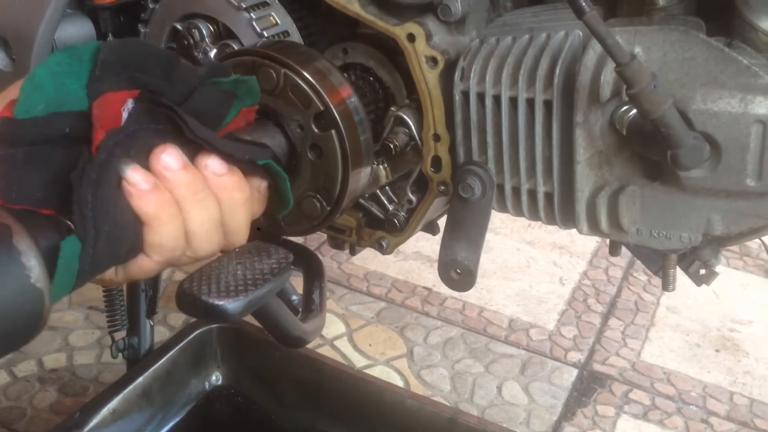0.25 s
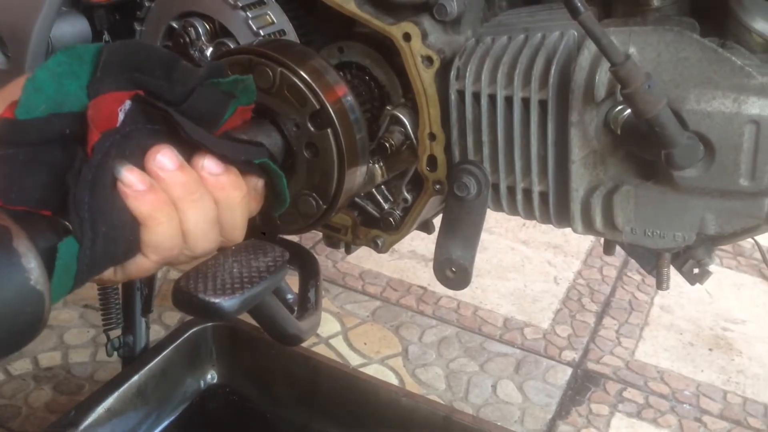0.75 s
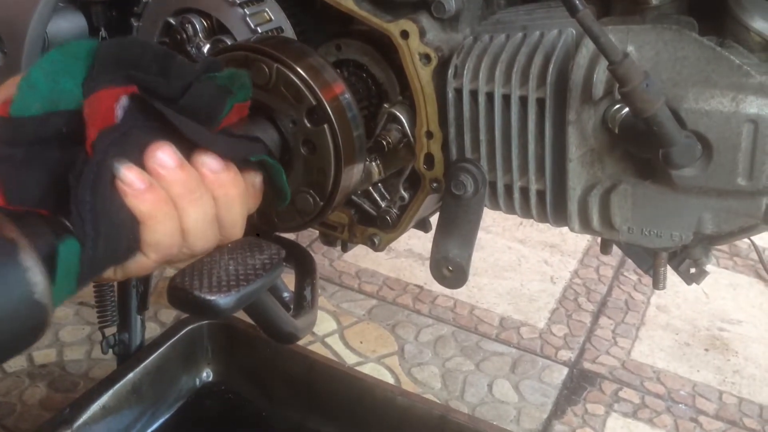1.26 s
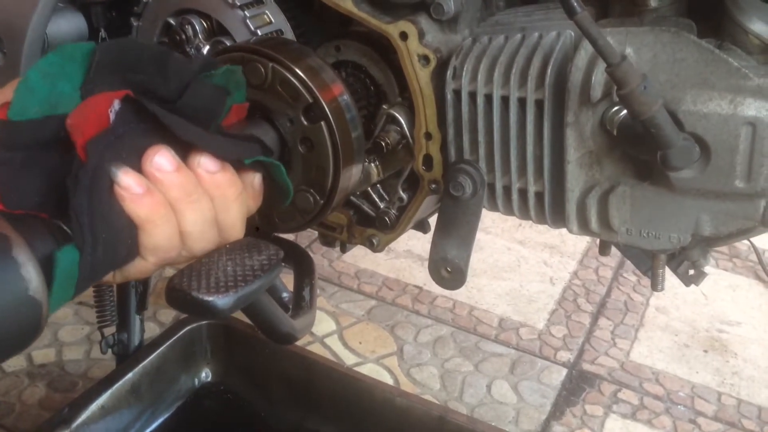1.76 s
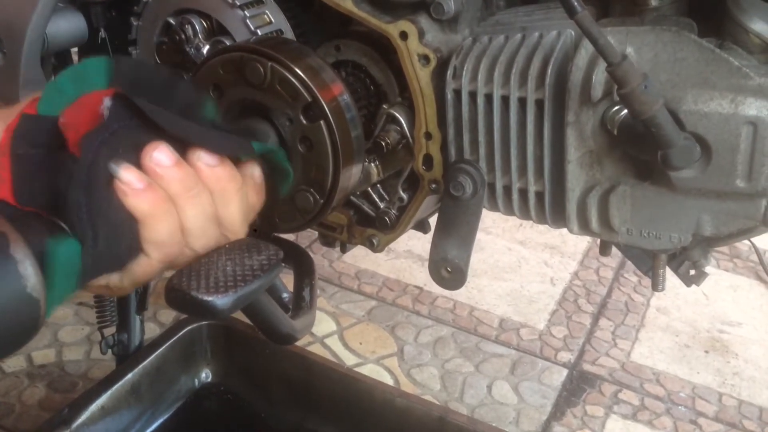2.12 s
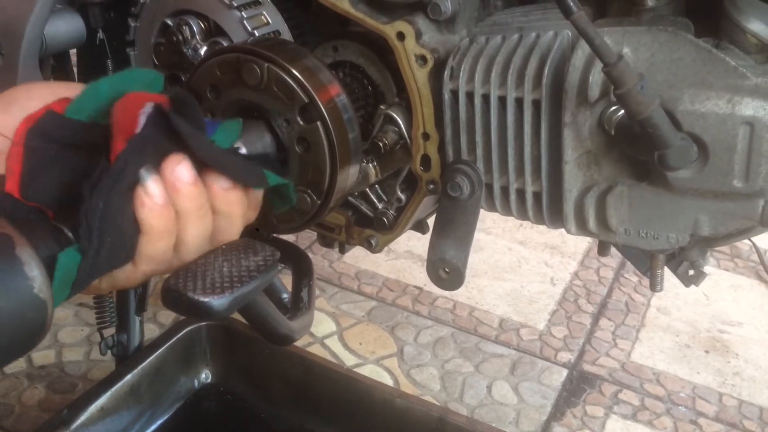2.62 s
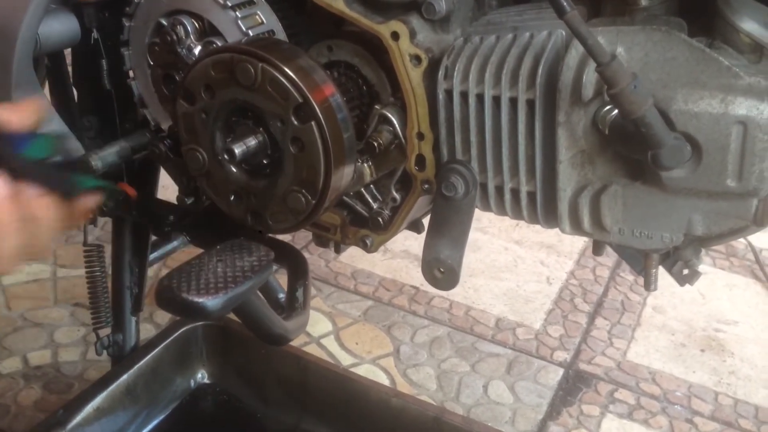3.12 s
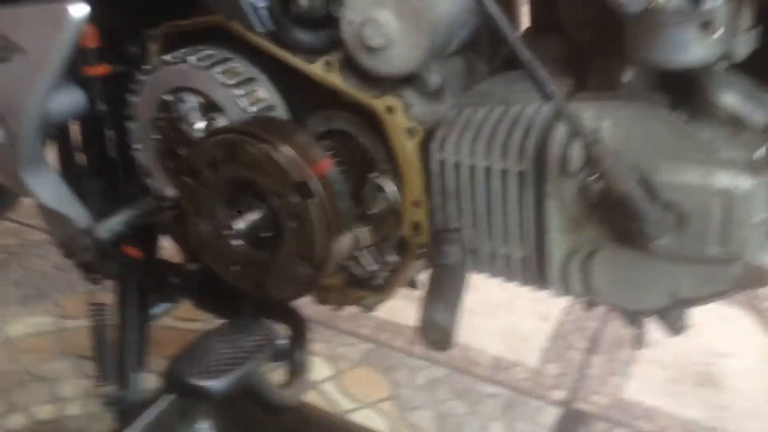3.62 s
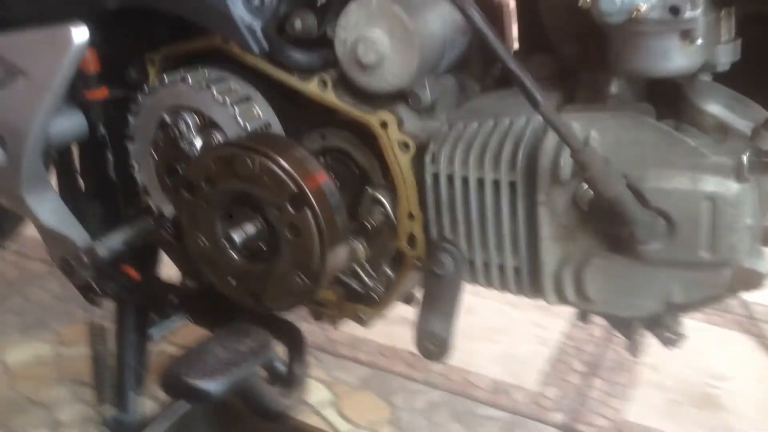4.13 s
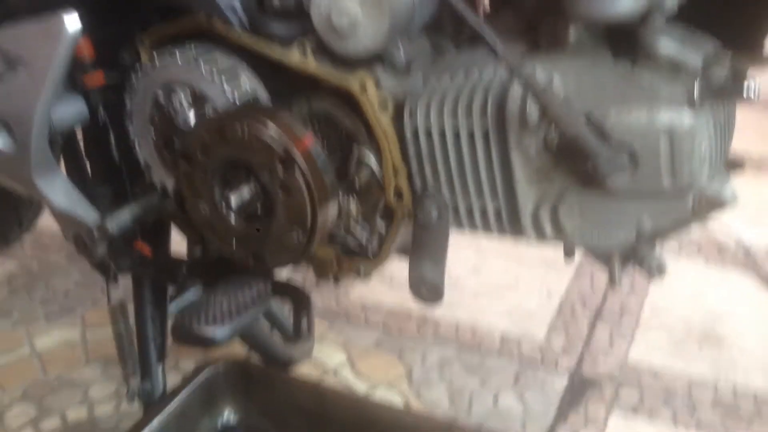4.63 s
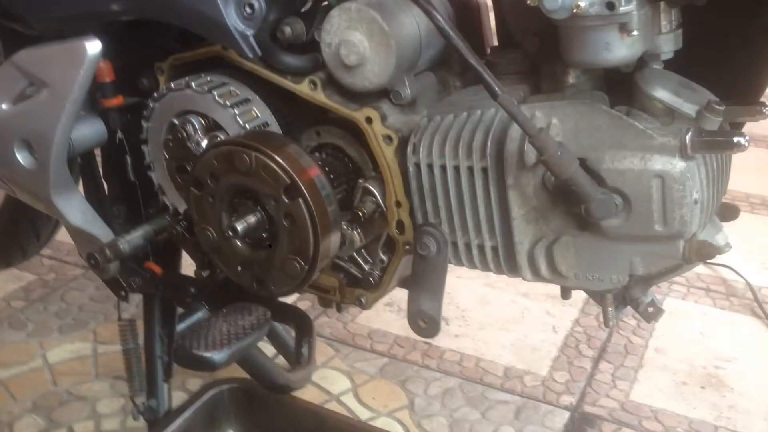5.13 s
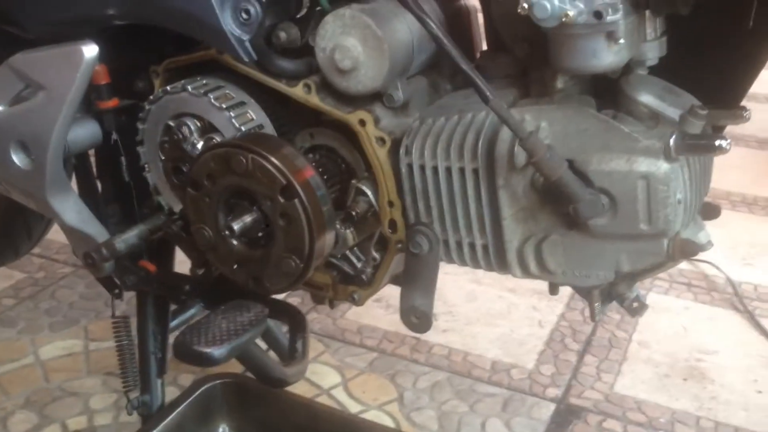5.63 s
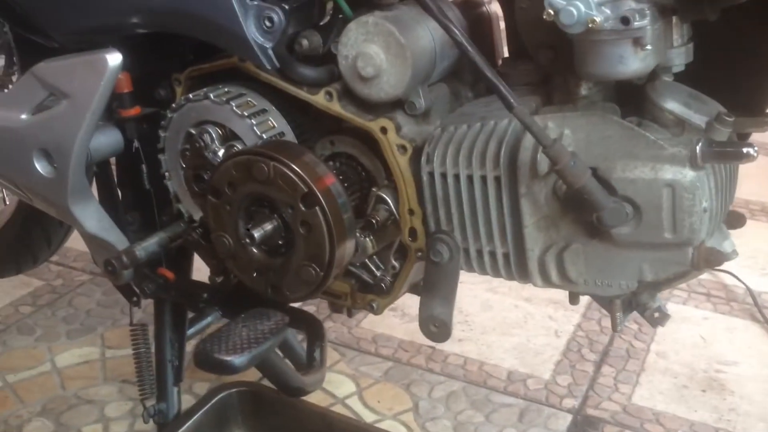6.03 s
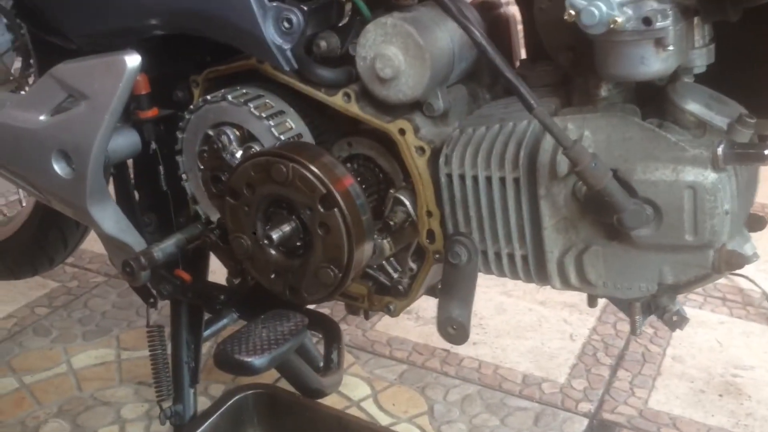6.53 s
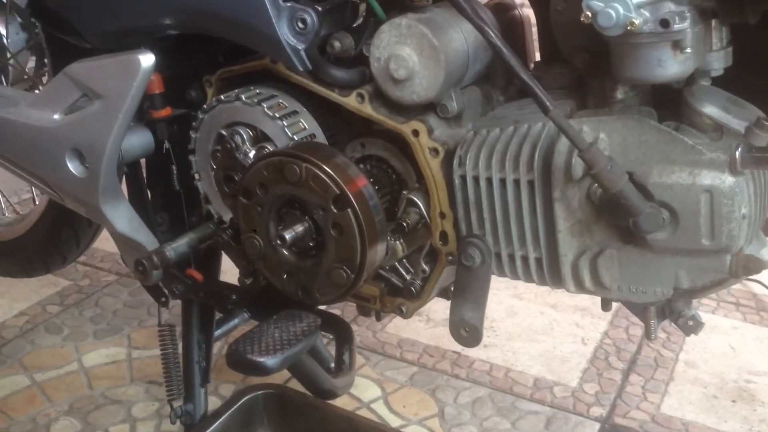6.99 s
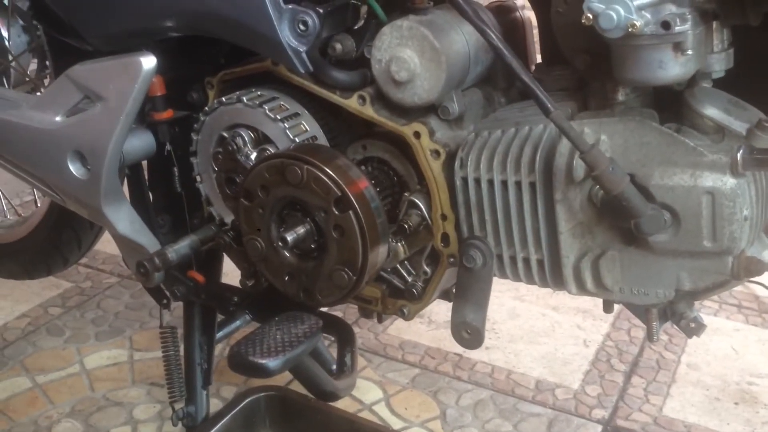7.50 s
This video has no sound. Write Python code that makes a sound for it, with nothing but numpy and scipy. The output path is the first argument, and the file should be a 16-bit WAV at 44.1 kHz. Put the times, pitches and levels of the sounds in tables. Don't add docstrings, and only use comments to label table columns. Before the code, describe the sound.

Outdoors in a paved yard, close microphone. Low traffic rumble for about a second, then an impact wrench fires three short, hard, rattling metal bursts with grinding gears. The socket slips off with a faint tinkle. After a pause with small ticks and cloth rubs, the tool is laid down in a hard clatter. Scattered small ticks follow while a motorbike putters softly in the distance.

```python
import sys
import numpy as np
from scipy import signal
from scipy.io import wavfile

SR = 44100
rng = np.random.default_rng(int(sys.argv[2]) if len(sys.argv) > 2 else 0)


def how_loud(loudness_db):
    steps = np.asarray(loudness_db, float) / 20
    return 10 ** steps


def int16_out(signal):
    q = np.round(np.clip(np.atleast_2d(signal).T, -1, 1) * 32767)
    wavfile.write(sys.argv[1], SR, q.astype(np.int16))


N = 341995

# start in seconds, peak in dB, hardness in dB, chatter length in seconds.
HAMMER_BLOWS = [(1.2752, -2, 4.5, .009), (1.2995, -8, 7, 0.012), (1.3235, -14, -3.5, 0.0074),
                (1.3425, -3.5, 0.5, 0.0063), (1.359, -20.5, 2, 0.0034), (1.410, -4, 0.5, 0.0072),
                (1.6685, -10.5, -1.5, .01), (1.691, -7, 6.5, 0.012), (1.712, -15.5, -0.5, 0.006),
                (1.732, -6, 3, 0.01), (1.8015, -7.5, 3, 0.015), (2.0235, -24, -10.5, 0.0044),
                (2.039, -22, -1.5, .003), (2.075, -4, 2, 0.012), (2.098, -1.5, 3, 0.0087),
                (2.156, -7.5, 2.5, 0.0077), (2.178, -21, 8, 0.0079)]
# start in seconds, peak in dB, hardness in dB, chatter in seconds.
SOCKET_BLOWS = [
    (2.234, -30, 2, 0.0046),
    (2.2545, -35, -3, .007),
    (2.297, -31.5, -6, .0034),
]
# start in seconds, peak in dB, hardness in dB, chatter in seconds.
NUT_BLOWS = [
    (2.6978, -48.5, 3, .003),
    (2.8579, -34, 0.5, 0.0072),
    (2.8844, -66, 2, .003),
]
# start in seconds, peak in dB, hardness in dB, chatter in seconds.
WASHER_BLOWS = [
    (.215, -70, 5, .01),
    (.850, -58, 0.3, .01),
    (.868, -59, -8, .013),
    (4.9615, -46.5, 12, 0.0085),
    (4.976, -54, 2, .006),
]
# start in seconds, peak in dB, hardness in dB, chatter in seconds.
LAY_DOWN_BLOWS = [
    (4.2398, -8, 0, 0.036),
    (4.3098, -13, 1.5, 0.032),
    (4.326, -27, -8, 0.023),
    (4.352, -15.5, 4, .03),
    (4.4507, -16, -2.5, 0.033),
    (4.505, -26, -2, 0.026),
]
# start in seconds, peak in dB, hardness in dB, chatter in seconds.
SLIDES = [
    (3.055, -40.5, -4.5, 0.042),
    (3.115, -42.5, -3.5, .025),
    (4.2, -37, -7, .07),
    (4.25, -31.5, -9.5, .07),
]
# start in seconds, peak in dB, hardness in dB, chatter in seconds.
CHUCK_RATTLES = [
    (4.2525, -27, 0.3, 0.011),
    (4.369, -27.5, -1.5, 0.03),
    (4.477, -17, 0.46, 0.016),
]
# start in seconds, peak in dB, hardness in dB, chatter in seconds.
SOFT_KNOCKS = [
    (3.044, -41, 0, 0.022),
    (4.125, -48.5, -7, 0.0088),
    (4.208, -42, -1.5, .04),
    (6.712, -27, 2, 0.019),
    (7.689, -35, -2.5, 0.024),
]
# start in seconds, peak in dB, hardness in dB, chatter in seconds.
PART_TICKS = [(.194, -42.5, -4, 0.0061), (3.267, -46, 7, 0.012), (3.594, -31, 8, 0.011),
              (4.774, -47, -8, 0.013), (4.865, -37, -2.5, 0.014), (5.021, -41, -6, 0.014),
              (5.125, -35.5, 1, 0.0077), (5.274, -43, 7, 0.0086), (6.073, -32.5, 0.5, .01),
              (6.186, -36.5, -4, 0.019), (6.283, -32.5, 1.5, .011)]

# frequency in Hz, level in dB, t60 in seconds.
CASE_MODES = [(110, -8, 0.014), (174, -18.5, 0.32), (323, -15.5, 0.013), (539, -3, 0.022), (616, -5, 0.032),
              (757, -9, 0.043), (980, 4.5, 0.016), (1100, 1.5, 0.037), (1138, 4, .02), (1570, -8, 0.03),
              (1658, -5.5, 0.014), (2200, 6.5, 0.0083), (3240, 4, 0.003), (3835, 0, 0.01),
              (4370, -2, 0.012), (4860, 0.5, 0.0076), (5530, -2.5, 0.0075), (6060, -5.5, 0.01),
              (7220, 5, 0.0027), (9090, -13, 0.00068), (10500, -5, 0.0021), (11640, -2.5, .004),
              (13050, -2.5, 0.0078), (13900, 1.5, 0.0073), (14900, 0.5, 0.0052)]
# frequency in Hz, level in dB, t60 in seconds.
SOCKET_MODES = [(4750, -6, .03), (5615, -18, .02), (7730, 0, .028), (8450, -4, .04), (10500, -8, .02),
                (11540, 0, .03), (12400, -3, .035), (13100, -8, .03)]
# frequency in Hz, level in dB, t60 in seconds.
NUT_MODES = [(2180, -4, .018), (2400, -6, .01), (13000, -8, .02), (13530, -3, .025), (14080, 0, .03),
             (14400, -1, .03), (14800, -4, .02)]
# frequency in Hz, level in dB, t60 in seconds.
WASHER_MODES = [(5100, -5, .12), (8300, 0, .08), (9550, -12, .12), (11690, 0, .11), (11900, -14, .06),
                (14300, -2, .08), (14830, -12, .08)]
# frequency in Hz, level in dB, t60 in seconds.
TRAY_MODES = [(160, 0, .1), (260, -4, .05), (370, -4, .05), (480, -4, .05), (630, -2, .09), (760, -1, .06),
              (850, 2, .1), (942, 0, .1), (1090, 2, .07), (1300, 0, .05), (1610, -1, .035), (2100, -5, .03),
              (2770, -6, .015), (4150, 2.5, .022), (4500, -3, .015), (5050, -1, .025), (5800, -5, .012),
              (6557, -4, .02), (8400, -3, .025), (8750, -1, .03), (9345, -4, .015), (10700, -4, .012),
              (12500, -4, .01), (14130, -3, .012)]
# frequency in Hz, level in dB, t60 in seconds.
PART_MODES = [(400, -3, .04), (530, -2, .04), (720, -2, .035), (850, -3, .03), (1100, -2, .03),
              (1400, -1, .035), (2050, -3, .02), (3000, -4, .01), (3900, -2, .012), (4450, 2, .022),
              (5000, 0, .015), (6000, -7, .01), (8800, -13, .022), (9500, -2, .02), (12000, -3, .01),
              (14200, -2, .01)]
GROUP_BORDERS_HZ = (2500, 9000)

# pulled in seconds, released in seconds, grind level in dB.
TRIGGER_PULLS = [
    (1.269, 1.424, -22),
    (1.668, 1.82, -23.5),
    (2.028, 2.169, -23),
]
# start in seconds, stroke length in seconds, level in dB.
RUB_STROKES = [
    (0.203, .06, -58),
    (.86, 0.06, -55),
    (3.04, 0.017, -57.5),
    (3.551, 0.12, -56.5),
    (3.899, 0.051, -47.5),
    (4.211, .1, -46.5),
    (4.34, 0.043, -56),
    (4.486, 0.019, -45.5),
]
# frequency in Hz, level in dB per Hz.
RUB_SPECTRUM = [(900, 0), (2000, 8.5), (3000, 1), (4200, 9.5), (5500, 4), (8300, -3), (11500, 0.5),
                (14500, 1), (15800, -14)]
# time in seconds, firings per second, exhaust level in dB.
BIKE_PASS = [
    (4.6, 25.3, -80.5),
    (5.6, 43.4, -62),
    (6.1, 33.4, -55),
    (6.6, 31.4, -51.5),
    (7.0, 27, -51.5),
    (7.75, 25.2, -52),
]
# start in seconds, length in seconds, first Hz, last Hz, level in dB.
MACHINE_TONES = [
    (2.65, 0.62, 156, 150, -56.5),
    (5.68, 0.308, 535, 498, -60),
    (6.8, 0.65, 1460, 1290, -63.5),
    (5.208, 0.037, 4140, 4120, -58.5),
]
# time in seconds, level in dB.
TRAFFIC_SWELL = [(0.0, -53.5), (.6, -54.5), (1.2, -55), (3.0, -53), (3.8, -55), (4.35, -54.5), (4.7, -54),
                 (5.1, -52.5), (5.65, -55), (6.3, -51.5), (6.9, -50.5), (7.3, -50.5), (7.75, -53.5)]
# frequency in Hz, level in dB per Hz.
STREET_SPECTRUM = [(15, -61), (25, -33), (37, -33.5), (68, -3), (110, 2), (195, -2), (362, -6), (558, -16),
                   (984, -13.5), (1100, -16.5), (1330, -19), (4350, -20), (7460, -30), (14700, -30),
                   (15900, -42)]
MIC_BAND_HZ = (60, 16300)

SMALL_SPREAD_DB = 1.5


def rms_one(x):
    return x / np.sqrt(np.mean(x ** 2) + 1e-20)


def in_time(rows):
    s, *columns = np.transpose(rows)
    t = np.arange(N) / SR
    return [np.interp(t, s, column) for column in columns]


def drift(rate):
    r = np.exp(-2 * np.pi * rate * 40 / SR)
    white = rng.standard_normal(N // 40 + 2002)
    slow = rms_one(signal.lfilter([1], [1, -2 * r, r * r], white)[2000:])
    return np.interp(np.arange(N) / 40, np.arange(len(slow)), slow)


def ring(force, hz, t60):
    r = how_loud(-60 / (t60 * SR))
    w = 2 * np.pi * hz / SR
    return signal.lfilter([0, np.sin(w)], [1, -2 * r * np.cos(w), r * r], force + 1e-18)


def body(force, modes, scatter_db, crack_db, contact_hz):
    low, high = GROUP_BORDERS_HZ
    crack = force * rng.choice([-1, 1], len(force))
    groups = how_loud(crack_db + np.array([[9.], [0], [0]])) * crack
    for k, (hz, level_db, t60) in enumerate(modes):
        group = np.searchsorted(GROUP_BORDERS_HZ, hz)
        sign = (-1) ** k
        groups[group] += sign * how_loud(level_db + scatter_db[k]) * ring(force, hz, t60)
    cuts = [([90, contact_hz], "band"), ([low, high], "band"), (high, "high")]
    filters = [signal.butter(3, hz, kind, fs=SR, output="sos") for hz, kind in cuts]
    return np.array([signal.sosfilt(sos, group) for sos, group in zip(filters, groups)])


def blows(events, modes, share_db, spread_db, crack_db, lead_db, contact_hz, grip, rise_s):
    out, size = np.zeros(N + SR), SR // 5
    held = [(hz, level_db, t60 * grip) for hz, level_db, t60 in modes]
    lead = round(rise_s * SR)
    for s, peak_db, hard_db, chatter_s in events:
        fade = how_loud(-20 * np.arange(size) / SR / max(chatter_s, 3e-4))
        spray = rng.standard_normal(size) * how_loud(1.3 * rng.standard_normal(size)) * fade
        spray[:lead] *= np.linspace(0, 1, lead) ** 2
        spray[lead] = how_loud(lead_db)
        scatter_db = spread_db * rng.standard_normal(len(modes))
        groups = body(spray, held, scatter_db, crack_db, contact_hz)
        groups = groups / np.abs(groups).max(axis=1, keepdims=True)
        group_db = peak_db + np.array(share_db) + hard_db * np.array([-1, 0, 1])
        at = round(s * SR)
        out[at:at + size] += how_loud(group_db) @ groups
    return out[:N]


def hammering():
    return blows(HAMMER_BLOWS, CASE_MODES, share_db=(-2.5, 0, 0.3), spread_db=2.0, crack_db=17.5,
                 lead_db=12, contact_hz=2300, grip=0.75, rise_s=0.0011)


def grind():
    out, size = np.zeros(N), SR // 3
    for pulled, released, grind_db in TRIGGER_PULLS:
        a = round(pulled * SR) - SR // 40
        t = (a + np.arange(size)) / SR
        since, after = t - pulled, np.maximum(t - released, 0)
        spin_db = np.minimum(2793.5 * since, -25.5 * since)
        coast_db = np.maximum(-645.5 * after, -10 - 236 * after)
        case_db = np.interp(since, [0, 0.044], [-9, 0.5])
        hiss_db = 0.5 - 57 * after
        teeth_db = 1.8 * rng.exponential(1, size) + 2.0 * drift(120)[:size]
        teeth = rng.standard_normal(size) * how_loud(teeth_db)
        groups = body(teeth, CASE_MODES, np.zeros(len(CASE_MODES)), crack_db=15, contact_hz=2300)
        low, middle, high = map(rms_one, groups)
        mix = middle + how_loud(case_db) * low + how_loud(hiss_db) * high
        out[a:a + size] = how_loud(grind_db + spin_db + coast_db) * mix
    return out


def laying_down():
    landing = blows(LAY_DOWN_BLOWS, TRAY_MODES, share_db=(0, -14, -30), spread_db=SMALL_SPREAD_DB, crack_db=27,
                    lead_db=27, contact_hz=1574, grip=0.3, rise_s=0.0005)
    slides = blows(SLIDES, TRAY_MODES, share_db=(0, -14, -25), spread_db=7.5, crack_db=26,
                   lead_db=-3, contact_hz=330, grip=0.46, rise_s=0.016)
    chuck = blows(CHUCK_RATTLES, TRAY_MODES, share_db=(-2.5, 0, -16), spread_db=SMALL_SPREAD_DB, crack_db=16,
                  lead_db=SMALL_SPREAD_DB + 18, contact_hz=1600, grip=0.43, rise_s=0.00098)
    return landing + slides + chuck


def tinkling():
    socket = blows(SOCKET_BLOWS, SOCKET_MODES, share_db=(-25, 0, -6), spread_db=4.0, crack_db=3,
                   lead_db=-8, contact_hz=2500, grip=0.65, rise_s=0.0008)
    washers = blows(WASHER_BLOWS, WASHER_MODES, share_db=(-25, 0, 0.3), spread_db=SMALL_SPREAD_DB, crack_db=1,
                    lead_db=7, contact_hz=2500, grip=1.0, rise_s=0.0008)
    nut = blows(NUT_BLOWS, NUT_MODES, share_db=(0, -8, 4), spread_db=8.5, crack_db=-4,
                lead_db=5.5, contact_hz=2820, grip=0.73, rise_s=0.00048)
    return socket + washers + nut


def small_parts():
    thumps = blows(SOFT_KNOCKS, PART_MODES, share_db=(0, -11, -30), spread_db=SMALL_SPREAD_DB, crack_db=19.5,
                   lead_db=14, contact_hz=1970, grip=0.87, rise_s=0.0012)
    ticks = blows(PART_TICKS, PART_MODES, share_db=(-3, 0, -18), spread_db=SMALL_SPREAD_DB, crack_db=15.5,
                  lead_db=15, contact_hz=2250, grip=0.82, rise_s=0.00095)
    return thumps + ticks


def yard(x):
    t = np.arange(SR // 4) / SR
    tail = rng.standard_normal(len(t)) * how_loud(-60 * t / 0.35) * (t > 0.006)
    tail = signal.lfilter([1], [1, -0.55], tail)
    return signal.fftconvolve(x, tail / np.sqrt(np.sum(tail ** 2)))[:N]


def banded(spectrum, patchy_db, rate):
    out, edges = np.zeros((3, N)), 25 * 2 ** np.arange(0, 9.5, 1 / 3)
    white, together = rng.standard_normal((2, N)), drift(2.4)
    hz_points, db_points = np.transpose(spectrum)
    for k, (low, high) in enumerate(zip(edges, edges[1:])):
        hz = np.sqrt(low * high)
        flicker_db = patchy_db * (0.5 * together + drift(rate))
        level_db = np.interp(np.log(hz), np.log(hz_points), db_points) + flicker_db
        sos = signal.butter(2, [low, high], "band", fs=SR, output="sos")
        out[np.searchsorted([450, 2600], hz)] += how_loud(level_db) * signal.sosfilt(sos, white[k % 2])
    return out


def scuffs():
    t = np.arange(N) / SR
    stroke = np.zeros(N)
    for s, length, db in RUB_STROKES:
        rise_db = 400 * (t - s)
        fall_db = 302 * (s + length - t)
        stroke += how_loud(db + np.minimum(0, np.minimum(rise_db, fall_db)))
    return stroke * rms_one(banded(RUB_SPECTRUM, patchy_db=-2.0, rate=40).sum(axis=0))


def motorbike():
    per_s, level_db = in_time(BIKE_PASS)
    firings = np.cumsum(per_s * (1 + 0.0335 * drift(21.5))) / SR
    fired = np.diff(np.floor(firings), prepend=0)
    puffs = signal.lfilter([-1, 1], [1, -0.99], fired * how_loud(3 * drift(30)))
    pipe = ring(puffs, 130, 0.045) + 0.9 * ring(puffs, 340, 0.025)
    started = np.arange(N) > BIKE_PASS[0][0] * SR
    return how_loud(level_db) * rms_one(pipe) * started


def far_tones():
    out = np.zeros(N)
    for s, length, first_hz, last_hz, db in MACHINE_TONES:
        along = 2 * (np.arange(N) / SR - s) / length - 1
        hz = first_hz + (last_hz - first_hz) * np.clip((along + 1) / 2, 0, 1)
        edge_db = -9 * np.minimum(along ** 4, 20)
        level_db = db + edge_db + 4.0 * drift(28)
        out += np.sqrt(2) * how_loud(level_db) * np.sin(2 * np.pi * np.cumsum(hz) / SR)
    return out


def street():
    roar_db, = in_time(TRAFFIC_SWELL)
    swing_db = roar_db - roar_db.mean()
    rumble, roar, hiss = map(rms_one, banded(STREET_SPECTRUM, patchy_db=1.1, rate=10))
    rumble = how_loud(2 + 1.1 * swing_db) * rumble
    hiss = how_loud(-5 + 1.48 * swing_db) * hiss
    return how_loud(roar_db.mean()) * (rumble + how_loud(swing_db) * roar + hiss)


def ducking():
    duck_db, sets_in_s, recovers_s = -4, 0.06, 1.41
    pulled = np.array(TRIGGER_PULLS)[:, :1]
    since = np.maximum(np.arange(N) / SR - pulled, 0)
    steps = (1 - np.exp(-since / sets_in_s)) * np.exp(-since / recovers_s)
    return how_loud(duck_db * np.sum(steps, axis=0))


def scene():
    metal = hammering() + laying_down() + tinkling() + small_parts()
    near = metal + how_loud(-18) * yard(metal) + grind() + scuffs()
    far = ducking() * street() + motorbike() + far_tones()
    return (near + far)[None]


def low_pass(x):
    return signal.sosfilt(signal.butter(12, 15300, fs=SR, output="sos"), x)


def record(dry):
    low_hz, high_hz = MIC_BAND_HZ
    x = signal.sosfilt(signal.butter(1, low_hz, "high", fs=SR, output="sos"), dry)
    x = 1.08 * np.tanh(x / 1.08)
    x = signal.sosfilt(signal.cheby2(12, 60, high_hz, fs=SR, output="sos"), x)
    return low_pass(x)


dry = scene()
out = record(dry)
int16_out(out)
```